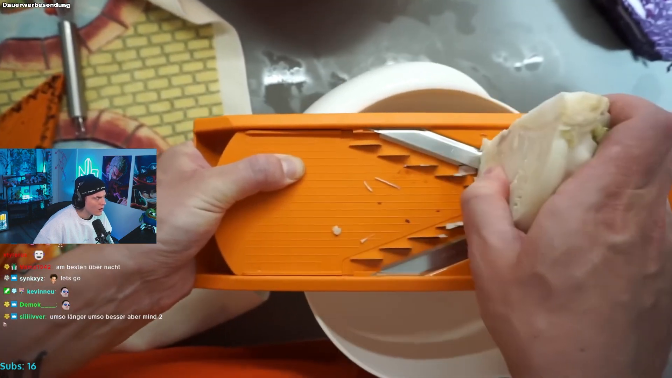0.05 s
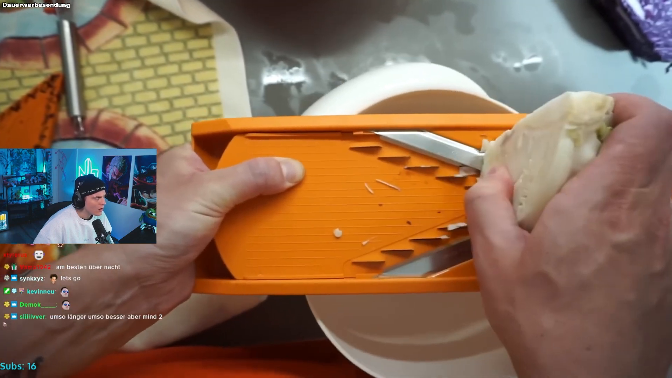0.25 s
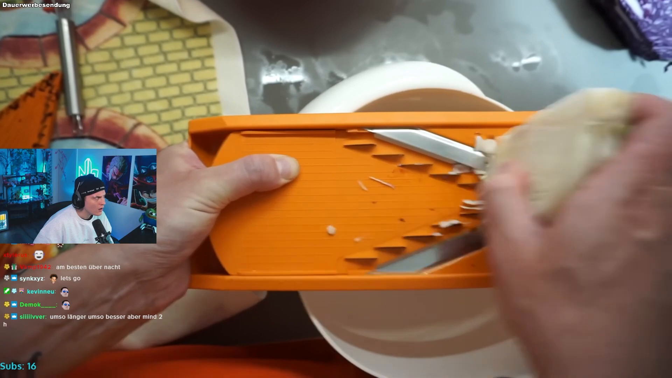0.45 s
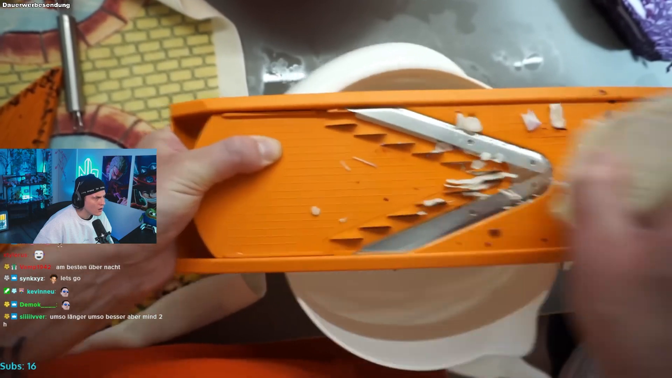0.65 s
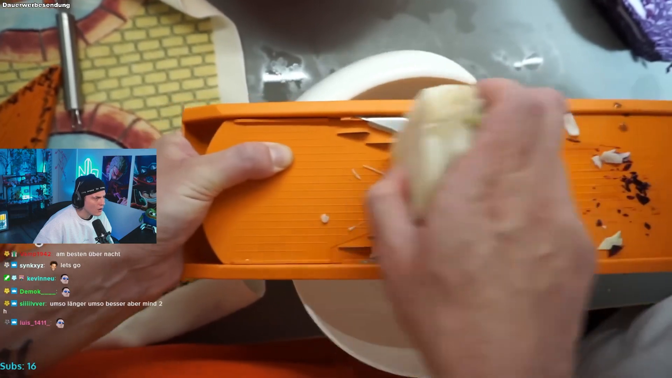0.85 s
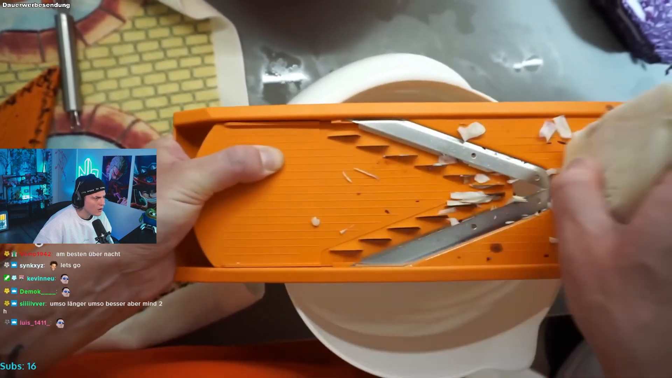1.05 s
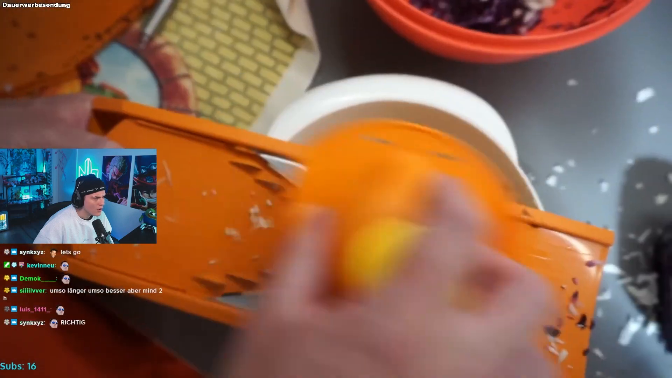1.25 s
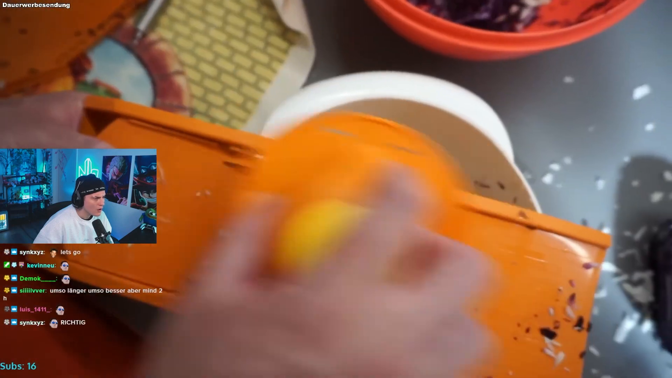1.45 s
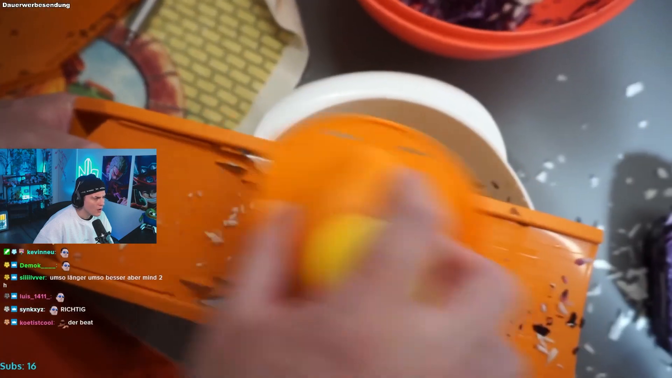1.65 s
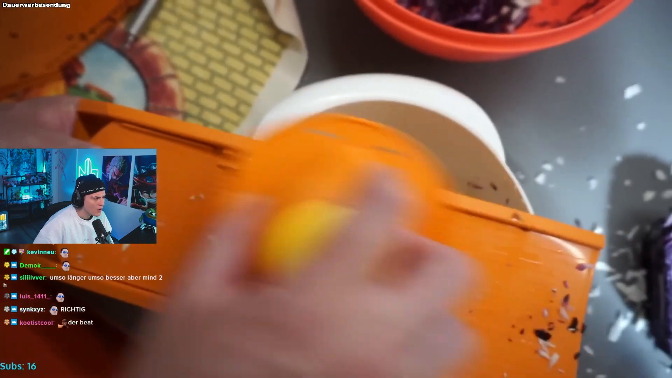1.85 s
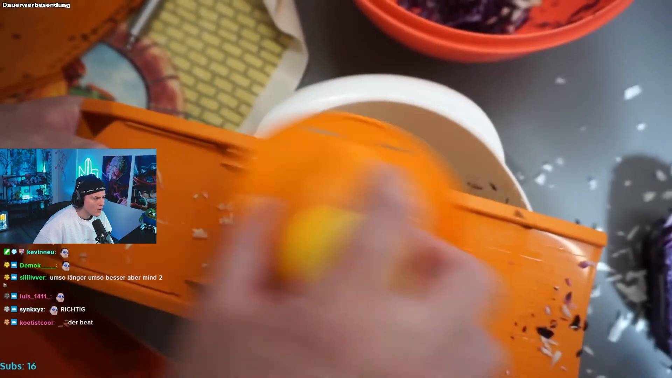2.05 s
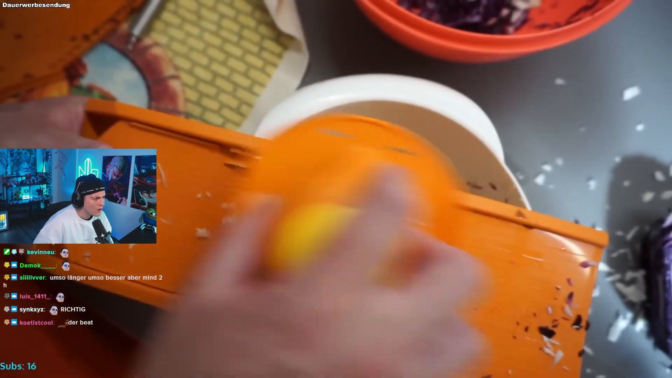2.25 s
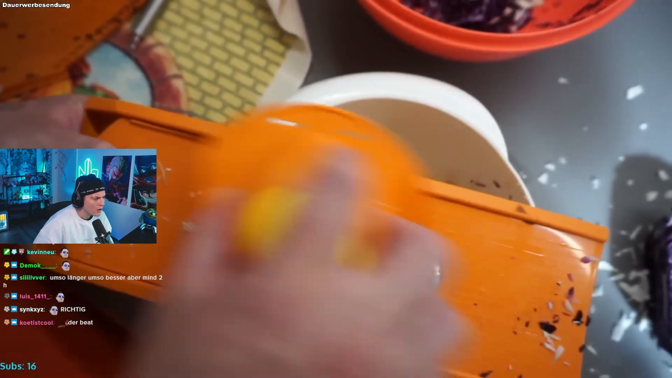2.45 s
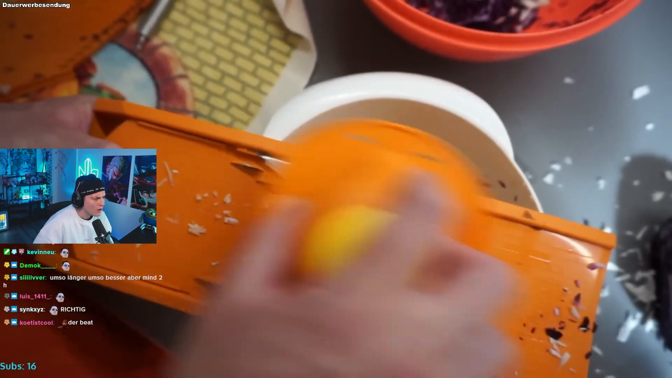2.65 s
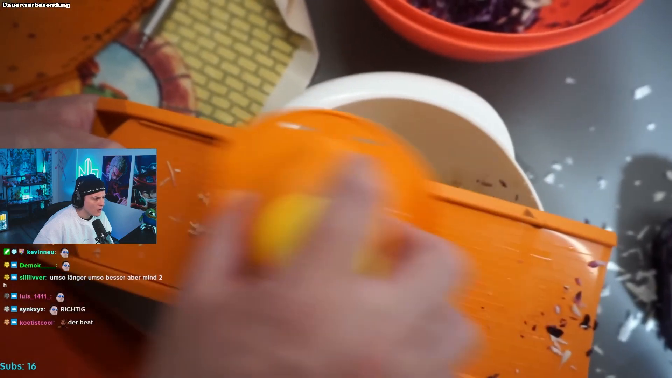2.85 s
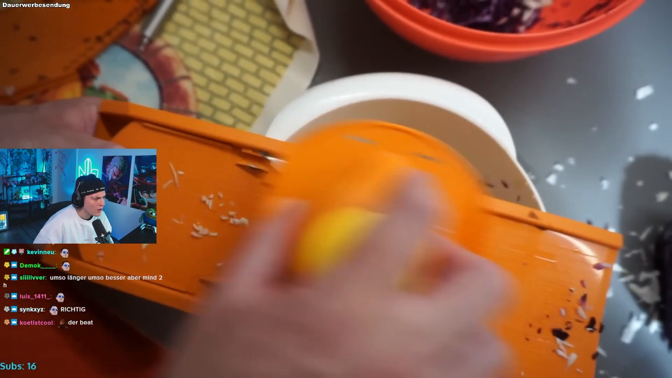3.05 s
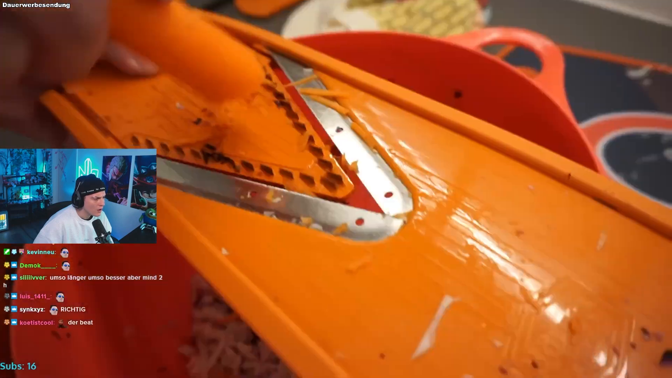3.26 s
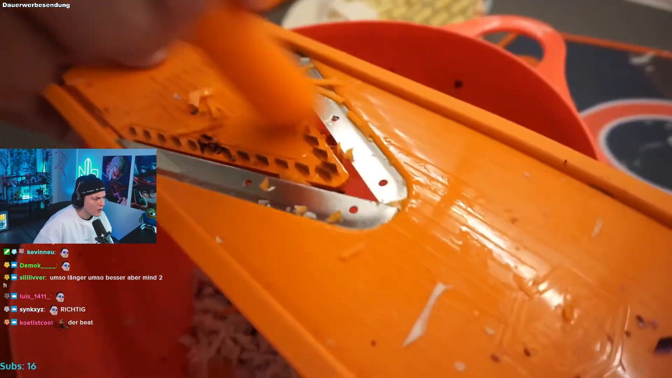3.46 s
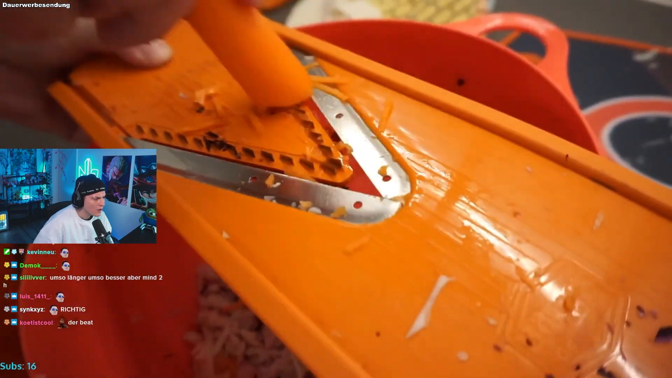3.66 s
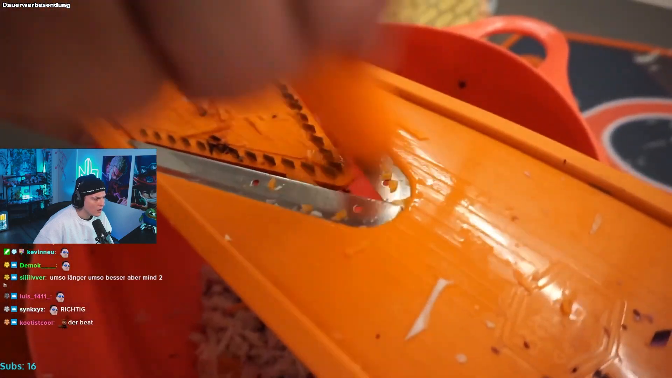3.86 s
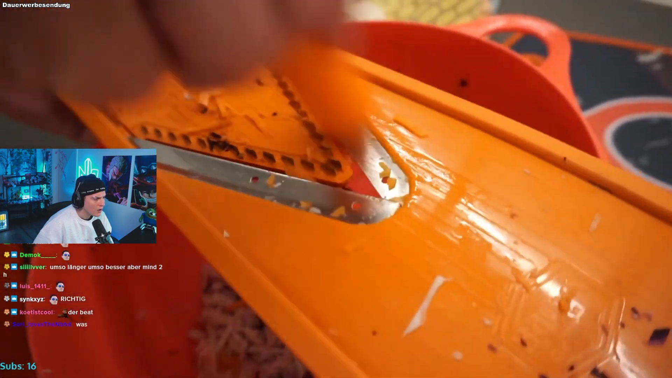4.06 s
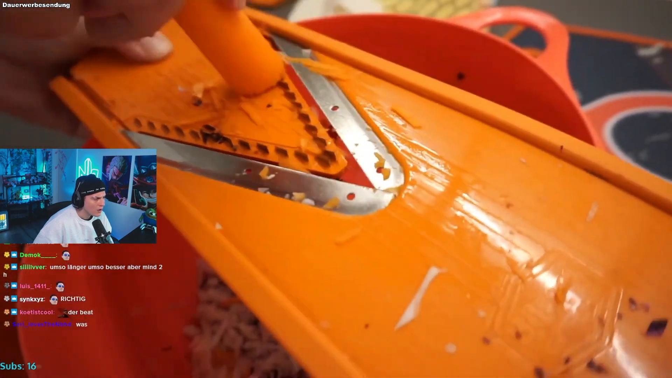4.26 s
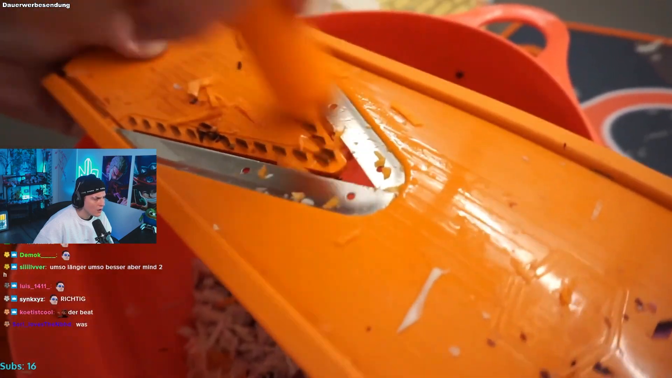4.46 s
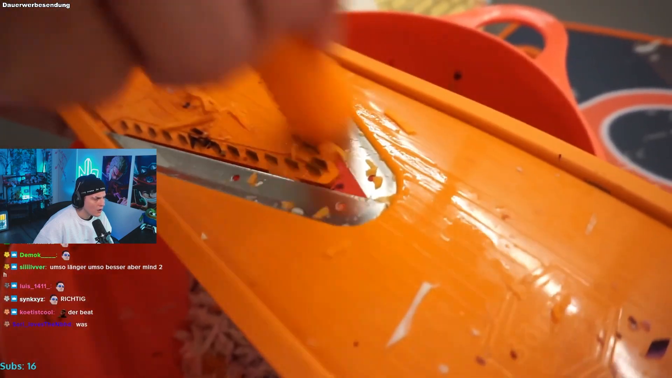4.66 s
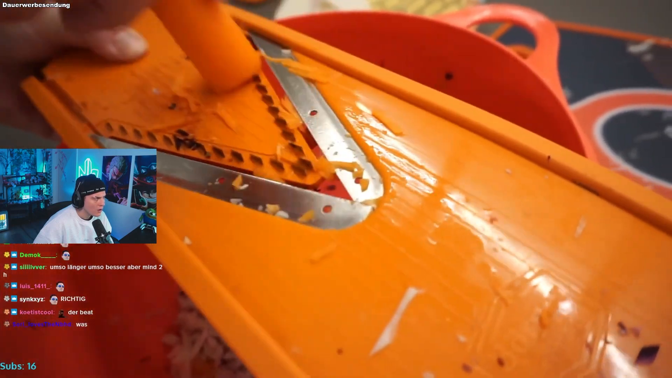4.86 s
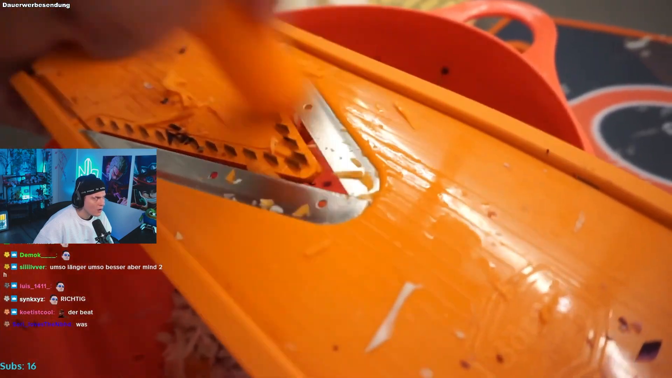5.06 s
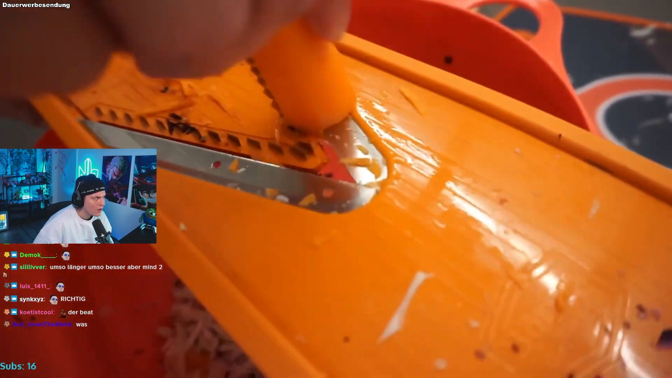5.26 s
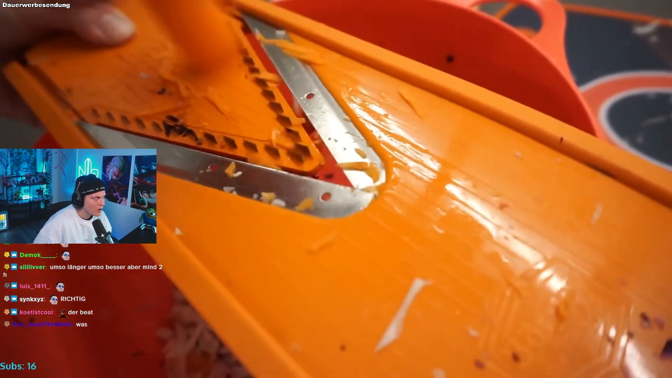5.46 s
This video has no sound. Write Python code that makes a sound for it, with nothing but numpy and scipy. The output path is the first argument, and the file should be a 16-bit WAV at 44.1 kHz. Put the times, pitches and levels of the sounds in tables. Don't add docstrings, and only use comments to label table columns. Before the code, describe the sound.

Cabbage tears across a plastic slicer in short, irregular hissing strokes for about a second. Then a guarded vegetable shuttles back and forth, louder and more resonant, with hard plastic clacks. After a brief drop-out, bare carrot rasps rapidly with crisp ticks. Low, boomy bowl thuds follow the hand's turns. Very close microphones, dry small kitchen, abrupt cuts.

```python
import sys
import numpy as np
from scipy import signal
from scipy.fft import rfft, irfft, next_fast_len
from scipy.io import wavfile
from scipy.ndimage import uniform_filter1d, map_coordinates

SR = 44100
rng = np.random.default_rng(int(sys.argv[2]) if len(sys.argv) > 2 else 0)


def gain_from_db(level_db):
    decades = np.asarray(level_db, float) / 20
    return 10 ** decades


def generate_wav(signal):
    frames = np.transpose(np.atleast_2d(signal))
    scaled = np.clip(frames, -1, 1) * 32767
    pcm = np.round(scaled).astype(np.int16)
    wavfile.write(sys.argv[1], SR, pcm)


N = 242991
SIZE = next_fast_len(N + SR // 2)
HZ = np.arange(SIZE // 2 + 1) * SR / SIZE + 1e-3
TIME = np.arange(N) / SR

# pitch_hz, level_db
ROOM_TONE = [(15, -25), (25, 1), (52, -9), (242, -25), (750, -33), (1260, -31), (3080, -42), (16000, -43)]
# pitch_hz, width_hz, level_db
DECK_MODES = [
    [(1100, 330, -1.5), (1580, 130, -1.5), (1890, 250, -2.5), (2600, 220, -3.5), (3390, 850, -16)],
    [(1040, 74, -16), (1270, 87, -7.5), (1336, 78, -9.5), (1444, 46, -2.5), (1626, 80, -3), (1659, 113, -8),
     (1840, 140, -11.5), (2000, 530, -16.5), (2740, 1240, -19)],
    [(1097, 120, 3.5), (1380, 79, 5.5), (1690, 200, -1), (1970, 60, -1), (2284, 360, -5.5),
     (3200, 3300, -24)],
]
# pitch_hz, width_hz, level_db
FRAME_MODES = [
    [(161.3, 19.5, -0.5), (252, 110, -10), (309, 53, -2), (526, 94, 2.5), (800, 180, -7)],
    [(199, 53, -4.5), (258.5, 180, -7.5), (334, 88, -5.5), (455, 58, -14), (560, 27, 0), (764, 36, -9),
     (920, 120, -13)],
    [(177, 220, -19.5), (232, 56, -1.5), (385, 43, -3), (416, 24, 4.5), (525, 38, 4.5), (610, 52, -1),
     (777, 63, -1), (846, 250, -14.5)],
]
# pitch_hz, width_hz, level_db
BOWL_MODES = [(95.6, 5.4, 23), (45.3, 38, -41.5)]
# pitch_hz, level_db (per Hz)
BLADE_HISS = [
    [(1350, -46), (2300, -31), (2570, -4.5), (3640, -5.5), (4040, -3.5), (7620, -8), (8870, -9.5),
     (12200, -8), (15700, -14.5)],
    [(1350, -21.5), (2300, 1.5), (2470, -12), (2680, -0.5), (3100, -10), (3940, -5.5), (6640, -8.5),
     (8950, -6), (15700, -11.5)],
    [(1350, -10.5), (2300, -2), (2770, 1), (3150, -6), (4040, -0.5), (5750, -3), (6920, -2), (12400, -1.5),
     (15700, -5.5)],
]
# clicks_per_s, size_scatter_db, chatter_hz, chatter_depth_db
FIBRES = [
    (17400, -0.5, 80, 1),
    (11930, 1.5, 70, 1.53),
    (7890, 1.8, 42, 0.95),
]
# start_s, end_s, squareness_speeding_up, squareness_slowing_down, resting_contact_db
SPANS = [
    (0, 1.11, 1.9, 1.26, -59.5),
    (1.11, 3.262, 2.07, 2.3, -51.5),
    (3.387, 5.52, 3.3, 2.65, -51.5),
]
# ring_turn_drop_db, frame_turn_drop_db, frame_above_hiss_db, frame_share_of_extra_ring (0-1), frame_late_s
COUPLING = [
    (11.5, 8.5, -1.5, 0.8, 0.025),
    (14.5, 15, -0.5, 0.4, 0.0013),
    (11.5, 17, -0.5, 0.8, 0.0018),
]
FRAME_SHAKE_DB = [2, -2.5, -3.5]
# fastest_s, speeding_up_s, slowing_down_s, hiss_db, ring_above_hiss_db
CABBAGE_STROKES = [(0.0, 0.047, 0.026, -29, -12), (0.093, 0.26, 0.1, -54, 10),
                   (0.225, 0.05, 0.06, -74.5, -8), (0.445, 0.04, 0.032, -37, -8),
                   (0.484, 0.031, 0.11, -26, -3), (0.726, 0.042, 0.059, -37.5, -5.5),
                   (0.851, 0.0048, 0.0061, -35.5, 14.5), (0.975, 0.096, 0.14, -27, 0)]
GUARD_STROKES = [(1.131, 0.0097, 0.032, -25.5, 2.5), (1.325, 0.13, 0.059, -28.5, -1),
                 (1.438, .02, 0.034, -47, 2), (1.5, 0.059, 0.086, -24.5, 3.5),
                 (1.711, 0.11, 0.082, -29.5, -0.5), (1.906, 0.06, 0.099, -24.0, 3),
                 (2.07, 0.053, 0.042, -34, 1.5), (2.11, 0.042, 0.081, -25, -2),
                 (2.239, 0.033, 0.017, -39, 7), (2.309, 0.057, 0.097, -22, 0),
                 (2.548, 0.11, 0.055, -26, -1.5), (2.724, 0.076, 0.09, -23.5, 3.5),
                 (2.925, 0.082, 0.092, -25, -1.5), (3.11, 0.059, 0.077, -23.5, 0),
                 (3.189, 0.045, 0.084, -35, -0.5)]
CARROT_STROKES = [(3.423, 0.024, 0.008, -54, 21.5), (3.529, 0.071, 0.064, -33.5, -2),
                  (3.657, 0.054, 0.065, -29.0, -2.5), (3.796, 0.051, 0.046, -32, -6.5),
                  (3.951, 0.039, 0.057, -26, -2.5), (4.078, 0.048, 0.042, -27, -7),
                  (4.222, 0.027, 0.086, -25.5, -2.5), (4.396, 0.081, 0.12, -26, -6),
                  (4.516, 0.024, 0.057, -27.5, -2), (4.679, 0.07, 0.12, -28.5, -5.5),
                  (4.803, 0.025, 0.08, -25.5, -4), (4.975, 0.078, 0.037, -27.5, -7.5),
                  (5.103, 0.042, 0.074, -24, -1.5), (5.247, 0.06, 0.13, -24.5, -9.5),
                  (5.383, 0.02, 0.049, -28, -5.5), (5.515, 0.029, 0.041, -31, -12)]
# top_s, level_db, building_s, dying_s
SHOVES = [(0.0, -42.5, .03, 0.076), (.19, -50, 0.057, 0.061), (0.506, -34.5, 0.0087, 0.23),
          (0.701, -57, 0.024, 0.12), (.86, -37, 0.018, 0.24), (1.06, -44, 0.087, 0.068),
          (1.16, -42, 0.027, .07), (1.29, -37, 0.035, 0.18), (1.49, -39, 0.028, 0.12),
          (1.6, -37, 0.028, 0.033), (1.7, -36, 0.051, 0.16), (1.89, -45, 0.046, .1),
          (1.99, -38.5, 0.047, 0.087), (2.1, -37, .05, .07), (2.19, -33.5, 0.043, 0.095),
          (2.3, -38, 0.035, 0.088), (2.375, -35.5, .04, 0.069), (2.592, -31.5, .06, 0.081),
          (2.7, -28, 0.025, 0.038), (2.775, -32, 0.04, 0.093), (2.93, -35, 0.029, 0.081),
          (3.02, -39, 0.043, .06), (3.1, -29.5, 0.032, .1), (3.2, -35.5, 0.046, 0.069),
          (3.42, -31.5, 0.03, 0.06), (3.53, -38, 0.034, 0.091), (3.68, -39, .06, .05),
                (3.82, -31.5, 0.049, 0.076), (3.965, -30, .03, 0.074), (4.1, -33, 0.033, 0.096),
                (4.248, -31, 0.046, .06), (4.33, -33.5, .03, 0.047), (4.48, -33.5, 0.04, 0.041),
                (4.552, -26.5, .035, 0.041), (4.69, -37, 0.049, .05), (4.848, -30.5, 0.05, 0.044),
                (4.975, -34.5, 0.036, 0.068), (5.148, -28, 0.071, 0.055), (5.245, -33, .03, 0.08),
                (5.375, -37.5, 0.022, 0.1)]
# start_s, peak_db, pitch_hz, crack_db,
# ring_s
END_KNOCKS = [(0.009, -14.5, 530, -3, 0.025), (0.059, -30, 598, 5, 0.042), (0.093, -19.5, 2040, 4.5, 0.025),
              (0.126, -13.5, 1350, -15, 0.02), (0.153, -19.5, 756, -16, 0.074),
              (0.223, -37.5, 557, 9, 0.048), (0.348, -30, 2020, -5, 0.06), (0.379, -47, 2060, 17.5, 0.056),
              (0.418, -40.5, 592, 13.5, 0.086), (0.712, -11, 2500, -18, 0.03),
              (0.738, -11, 1970, -14, 0.039), (0.779, -11, 2030, -18, 0.038),
              (0.852, -0.5, 893, -21.5, 0.032), (0.979, -6.5, 530, -15, 0.074),
              (1.129, -18, 570, -14, 0.04), (1.422, -25, 1450, 6, 0.064), (1.456, -11.5, 1660, -6, 0.13),
              (1.549, -5.5, 568, -11, 0.073), (1.77, -5.5, 946, -9.5, 0.059),
              (1.859, -12, 1475, -11, 0.056), (2.262, -1.5, 1390, -7, 0.1),
              (3.397, -17, 590, -31, 0.083), (3.415, -4.5, 560, -29, 0.053),
                     (3.914, -12.5, 520, -23, 0.1), (4.088, -6, 648, -28.5, 0.057),
                     (4.204, -12, 504, -27, 0.11), (4.259, -13, 610, -8.5, 0.089),
                     (4.407, -12.5, 720, 3, 0.072), (4.533, -6, 535, -9, 0.066),
                     (4.673, -13, 546, 1, 0.072), (4.722, -16, 1093, 7.5, 0.062),
                     (5.067, -15.5, 525, -4, 0.04), (5.498, -10, 1675, -1, 0.018)]
# start_s, peak_db, pitch_hz, crack_db, ring_s
LOW_THUDS = [(0.15, -28, 184, -28, 0.24), (0.85, -12, 355, -10, 0.19), (1.13, -9, 313, -13.5, 0.058),
             (3.817, -15.5, 237, -26, 0.1), (4.532, -14, 382, -14, 0.09), (1.459, -17.5, 186, -22, 0.13),
             (1.545, -12, 177, -31, 0.1), (1.774, -18, 297, -23, 0.2), (5.138, -14.5, 300, -24, 0.07)]
HARD_CLACKS = [(1.1308, -18, 2600, -10, 0.034), (3.3972, -25, 650, -22, 0.03),
               (3.4151, -6.5, 1070, -19.5, 0.052), (0.472, -13.5, 520, -11.5, 0.085),
               (5.9, -1.5, 1380, -28.5, 0.1), (6.1, -1.5, 1100, -14.5, 0.023),
               (5.3188, -6, 1400, -11.5, 0.026), (4.9, -4, 1200, -13, 0.034), (2.5, -14, 2300, -17.5, 0.03),
               (2.3, -9, 430, -17, 0.06), (1.2, -20, 2700, -5, 0.062), (2.5, -15, 1700, -13, 0.044),
               (0.67, -29.5, 2500, -2, 0.066)]
# start_s, peak_db, pitch_hz, crack_db, ring_s
BLADE_BITES = [(0.854, -9.5, 620, -16.5, .04), (0.853, -7, 1130, -13, .025), (0.712, -18, 2050, -25, .03),
               (0.78, -11.5, 2740, -21, .03), (1.31, -8, 1490, -8, .06), (1.481, 3, 1460, -21, .06),
               (1.682, -14.5, 1508, -16, .06), (1.897, -1.5, 1424, -16, .07), (1.954, -5.5, 1550, -7, .05),
               (2.087, -6, 1450, -12, .06), (2.318, -0.5, 1590, -21, .06), (2.354, -7.5, 1590, -11, .05),
               (2.376, -2, 1600, -14, .04), (2.575, -6, 1580, -9, .05), (2.694, -14, 1450, -21, .06),
               (2.916, -12, 776, 0, .05), (3.087, -7, 570, -17, .06), (3.091, -2, 1440, -7, .05),
               (3.136, 3, 1420, -10, .06), (3.19, -14, 1425, -3, .04), (3.621, -21, 455, -11, .05),
               (4.038, -14.5, 514, -9, .05), (4.36, -16.5, 616, 0, .05), (4.493, -11, 1320, -14, .05),
               (4.791, -9.5, 530, -20, .06), (4.796, -9.5, 1520, -16, .05), (4.956, -9.5, 563, -20, .05),
               (5.086, -11, 1380, -14, .05), (5.107, -6.5, 1560, -13, .05), (5.138, -6.5, 600, -12, .03),
               (1.14, -5.5, 560, -25, .07), (1.365, -16.5, 700, -15, .04), (1.542, -2, 1410, -12.5, .04),
               (0.995, -6, 560, -18, .06), (2.595, -10, 1510, -2, .03), (2.99, -12.5, 1410, 3, .03),
               (2.762, -5, 1520, -15, .04), (2.784, -12, 1510, -9, .04), (4.975, -9, 380, -17, .06),
               (5.122, -12, 1130, -16.5, .05), (5.392, -8, 1350, -6, .05), (0.229, -29.5, 2720, -2.5, .03)]
# start_s, peak_db, pitch_hz, crack_db, ring_s
HOLLOW_NOTES = [(1.215, -18, 560, -24, .1), (1.935, -9, 537, -24, 0.12), (1.955, -11, 560, -27, 0.07),
                (2.112, -8, 560, -20, .08), (2.3, -8.5, 568, -25, 0.12), (2.345, -13, 537, -26, 0.057),
                (2.72, -8, 560, -27.5, 0.054), (2.93, -14, 560, -26, 0.092), (3.8, -14.5, 600, -26, .07),
                (4.245, -16, 560, -22.5, 0.09), (4.415, -5.5, 1840, -21, 0.033),
                (4.825, -16, 486, -22, .06), (0.5, -14, 560, -16, 0.065), (0.555, -18, 445, -21, .08)]
# start_s, peak_db, tail_s
FIBRE_SNAPS = [(0.4174, -18.5, 0.03), (0.4718, -10.5, 0.03), (0.6934, -31, 0.03), (1.4222, -35.5, 0.03),
               (1.4546, -16.5, 0.03), (1.7684, -35, 0.03), (1.8584, -16.5, 0.03), (2.2633, -11, 0.03),
               (2.2887, -10, 0.03), (2.6439, -22, 0.03), (2.6648, -17.5, 0.03), (3.0444, -18.5, 0.03),
               (3.0684, -23, 0.03), (3.0854, -18, 0.03), (3.4555, -23, 0.03), (3.465, -17, 0.03),
               (3.6167, -18, 0.03), (3.7379, -23.5, 0.03), (3.765, -22.5, 0.03), (3.9145, -22, 0.03),
               (3.917, -16.5, 0.03), (4.0422, -21.5, 0.03), (4.1989, -15, 0.03), (4.2078, -16, 0.03),
               (4.2593, -0.5, 0.03), (4.4094, -9.5, 0.03), (4.4377, -13, 0.03), (4.5354, -14, 0.03),
               (4.6279, -13.5, 0.03), (4.8023, -18, 0.03), (4.9132, -19.5, 0.03), (5.0679, -18.5, 0.03),
               (5.1248, -13, 0.03), (5.1951, -22, 0.03), (5.3108, -4, 0.03), (5.3752, -13.5, 0.03),
               (5.4979, -22, 0.03)]
# pitch_hz, side_minus_mid_db
PORT_WIDTH = [(60, -30.5), (110, -37), (200, -32), (380, -25), (700, -8.5), (1400, -8.5), (2100, -5.5),
              (4400, 0.5), (8120, -7.5), (13000, -12)]
# from_hz, to_hz, share_dropped (0-1), rest_lifted_db
SIDE_DROPOUTS = [
    (0, 170, .85, 11),
    (170, 400, .45, 6),
    (7200, 16000, .33, 3.5),
]


def unit(x):
    return x / np.sqrt(np.mean(np.abs(x) ** 2))


def through(x, response):
    return irfft(rfft(x, SIZE) * response, SIZE)[:N]


def modes(table):
    total = 0
    for k, (hz, width, db) in enumerate(table):
        damping = 1j * HZ * width
        total = total + (-1) ** k * gain_from_db(db) * damping / (hz * hz - HZ * HZ + damping)
    return unit(total)


def colour(points):
    hz, db = np.transpose(points)
    return gain_from_db(np.interp(np.log(HZ), np.log(hz), db))


def walk(rate):
    return 1.2 * np.interp(TIME * rate, np.arange(600), rng.standard_normal(600))


def hump(s, rise, fall, db, drop_db, squareness):
    coarse = TIME[::32]
    t = coarse[:, None] - s
    gone = np.abs(t) / np.maximum(np.where(t < 0, rise, fall), 0.004)
    lost_db = drop_db * np.minimum(gone, 9) ** np.where(t < 0, *squareness)
    return np.interp(TIME, coarse, gain_from_db(db - lost_db).sum(axis=1))


def kitchen():
    return gain_from_db(-54) * unit(through(rng.standard_normal(N), colour(ROOM_TONE)))


def tearing(rate, scatter_db, chatter, depth_db):
    when, sign, size = rng.random(N), rng.standard_normal(N), rng.exponential(size=N)
    hardest = 3.5
    level_db = scatter_db * np.minimum(size, hardest) + depth_db * walk(chatter)
    return unit((when < rate / SR) * sign * gain_from_db(level_db))


def shoves():
    s, db, building, dying = np.transpose(SHOVES)
    return hump(s, building, dying, db, 16, [1.65, 1.65])


def slicing(k, strokes, clicks, jolts):
    s, rise, fall, db, ring_db = np.transpose(strokes)
    start, end, *squareness, rest_db = SPANS[k]
    ring_drop_db, frame_drop_db, frame_db, share, late = COUPLING[k]
    rest = gain_from_db(rest_db)
    blade_drive = hump(s, rise, fall, db, 20, squareness) + rest
    ring_drive = hump(s, rise, fall, db + ring_db, ring_drop_db, squareness) + rest
    frame_level_db = db + frame_db + share * ring_db
    frame_drive = hump(s + late, rise, fall, frame_level_db, frame_drop_db, squareness) + rest
    shake_drive = gain_from_db(FRAME_SHAKE_DB[k]) * jolts

    blade = through(clicks[0] * blade_drive, unit(colour(BLADE_HISS[k])))
    ring = through(clicks[1] * ring_drive, modes(DECK_MODES[k]))
    frame = through(clicks[2] * frame_drive, modes(FRAME_MODES[k]))
    shaken = through(clicks[2][::-1] * shake_drive, modes(FRAME_MODES[k][:3]))

    flex_s, flex_hz = 0.0025, 8
    bend = uniform_filter1d(walk(flex_hz), size=SR // 16)
    ring = map_coordinates(ring, [(TIME + flex_s * bend) * SR], mode="mirror")
    scrape = blade + ring + frame + shaken
    thump = jolts + gain_from_db(-23.5) * frame_drive
    edge_s = 0.0024
    gate = np.clip(np.minimum(TIME - start + edge_s, end - TIME + edge_s) / edge_s, 0, 1)
    return np.array([scrape, thump]) * gate


def patchy(x):
    hz, _, cells = signal.stft(x, SR, nperseg=512)
    shape = (len(hz) // 5 + 1, cells.shape[1] // 4 + 1)
    swell = rng.standard_normal(shape)
    gap = rng.random(shape) < 0.04

    def spread(v):
        wide = np.kron(v, np.ones((5, 4)))[:len(hz), :cells.shape[1]]
        return uniform_filter1d(wide, size=3, axis=1)

    low_db, high_db, gap_db, turnover_hz = 2.5, 3, -12, 3000
    high = (hz ** 2 / (hz ** 2 + turnover_hz ** 2))[:, None]
    db = (low_db + (high_db - low_db) * high) * spread(swell) + gap_db * high * spread(1.0 * gap)
    return signal.istft(cells * gain_from_db(db), SR, nperseg=512)[1][:N]


def bowl():
    x = through(rng.standard_normal(N), modes(BOWL_MODES))
    level = np.sqrt(uniform_filter1d(x * x, SR // 40))
    return unit(x / (level + 0.13) ** 0.75)


def knocks():
    out, t = np.zeros(N + SR), TIME[:SR // 8]
    events = END_KNOCKS + LOW_THUDS + HARD_CLACKS + BLADE_BITES + HOLLOW_NOTES
    for s, db, hz, crack_db, t60 in events:
        spread, phase = rng.standard_normal((2, 6, 1))
        fade = np.exp(-np.log(1000) * t / max(t60, 0.005))
        pitches = hz * np.exp(0.122 * spread * np.arange(6)[:, None] / 5)
        ring = np.sin(2 * np.pi * pitches * t + 0.5 * phase).sum(axis=0)
        ring /= np.abs(ring * fade).max()
        crack = gain_from_db(crack_db) * uniform_filter1d(rng.standard_normal(len(t)), size=3) * 1.4
        onset = np.minimum(t / 0.0029, 1)
        i = int(s * SR)
        out[i:i + len(t)] += gain_from_db(db - 5) * (ring + 0.7 * crack) * fade * onset
    return out[:N]


def snaps():
    out, t = np.zeros(N + SR), TIME[:SR // 8]
    for s, db, t60 in FIBRE_SNAPS:
        spray = rng.standard_normal(len(t))
        tick = np.exp(-t / 0.00013)
        fade = tick + gain_from_db(-4) * np.exp(-np.log(1000) * t / max(t60, 0.003))
        i = int(s * SR)
        out[i:i + len(t)] += gain_from_db(db - 11) * spray * fade
    low_hz = 1200
    return through(out[:N], 1j * HZ / (low_hz + 1j * HZ))


def tail(t60):
    t = TIME[:SR // 2]
    burst = rng.standard_normal(len(t)) * np.exp(-np.log(1000) * t / t60)
    cloud = unit(rfft(burst, SIZE))
    return unit(cloud / (uniform_filter1d(np.abs(cloud), size=40) + 0.1) ** 0.9)


def ports(mid):
    echo = tail(0.034) * colour(PORT_WIDTH)
    turn = np.cumsum(walk(67)) * 2 * np.pi * 25 / SR
    reflected = through(mid, echo) * np.cos(turn) + through(mid, 1j * echo) * np.sin(turn)
    lean, lean_hz = -0.088, 700
    return reflected + through(mid, lean * HZ ** 2 / (HZ ** 2 + lean_hz ** 2))


def stereo_dropouts(pair):
    mid, side = (pair[0] + pair[1]) / 2, (pair[0] - pair[1]) / 2
    hz, _, cells = signal.stft(side, SR, nperseg=1024)
    for lo, hi, share, lift_db in SIDE_DROPOUTS:
        for edge in np.arange(lo, hi, 900):
            kept = np.repeat(rng.random(cells.shape[1]) > share, 3)[:cells.shape[1]]
            band = (hz >= edge) & (hz < min(edge + 900, hi))
            cells[band] *= kept * gain_from_db(lift_db)
    side = signal.istft(cells, SR, nperseg=1024)[1][:N]
    return np.array([mid + side, mid - side])


def scene():
    clicks = [tearing(*layer) for layer in FIBRES]
    vegetables = (CABBAGE_STROKES, GUARD_STROKES, CARROT_STROKES)
    jolts = shoves()
    scrape, thump = sum(slicing(k, strokes, clicks, jolts) for k, strokes in enumerate(vegetables))
    slicer = patchy(scrape) + knocks() + snaps()
    mid = slicer + gain_from_db(-8.5) * through(slicer, tail(0.27)) + thump * bowl()
    side = ports(mid)
    fade_s = 0.0029
    outside = np.maximum(SPANS[1][1] + fade_s - TIME, TIME - SPANS[2][0] + fade_s)
    splice = np.clip(outside / fade_s, 0, 1)
    pair = np.array([mid + side, mid - side]) * splice
    room_side = through(kitchen(), HZ / (HZ + 700)) * 0.6
    pair = pair + np.array([[1], [-1]]) * room_side + kitchen() * 0.8
    left_db = -0.2
    return pair * gain_from_db(np.array([[left_db], [-left_db]]) / 2)


def band_limit(x):
    return signal.sosfilt(signal.butter(12, 15980, fs=SR, output="sos"), x)


def record(dry):
    soft = np.tanh(dry)
    top_cut = signal.ellip(10, 0.3, 80, 15980, fs=SR, output="sos")
    mix = signal.sosfilt(top_cut, stereo_dropouts(soft))
    return band_limit(mix)


dry = scene()
out = record(dry)
generate_wav(out)
```